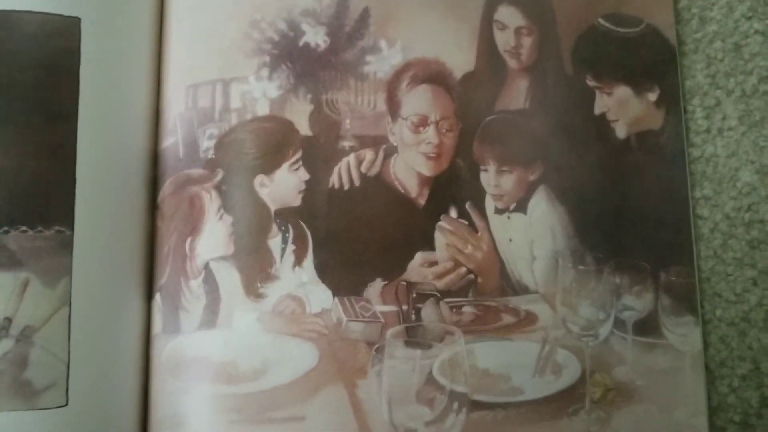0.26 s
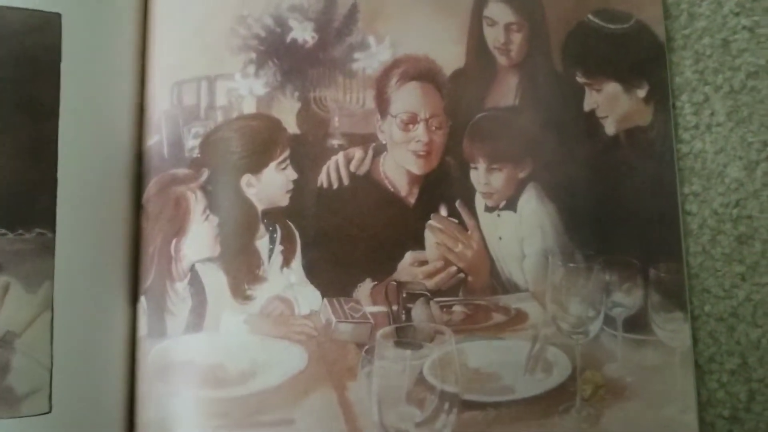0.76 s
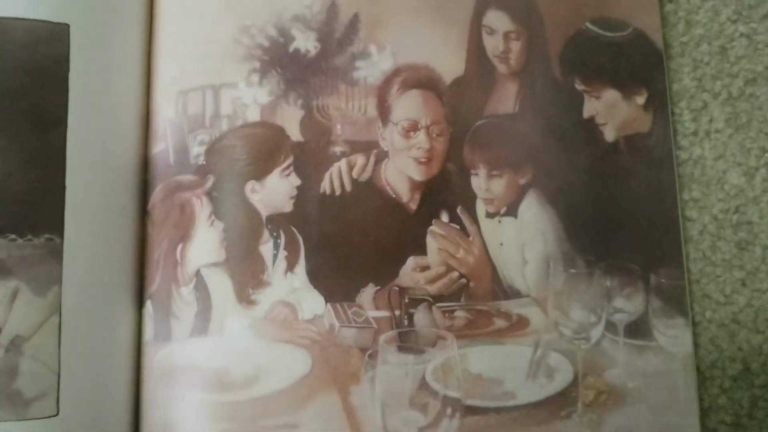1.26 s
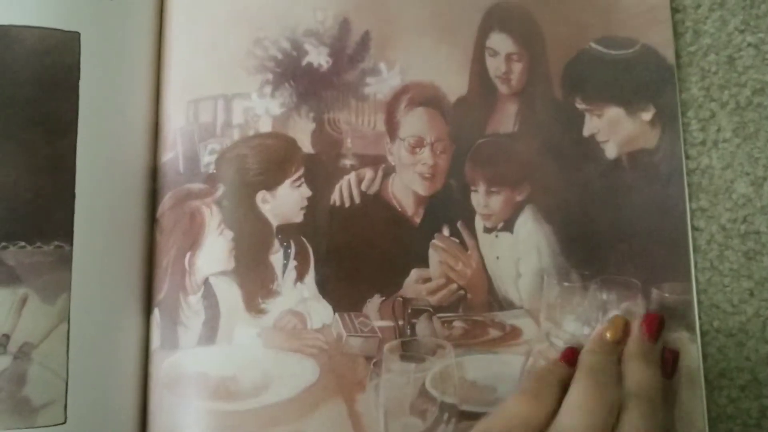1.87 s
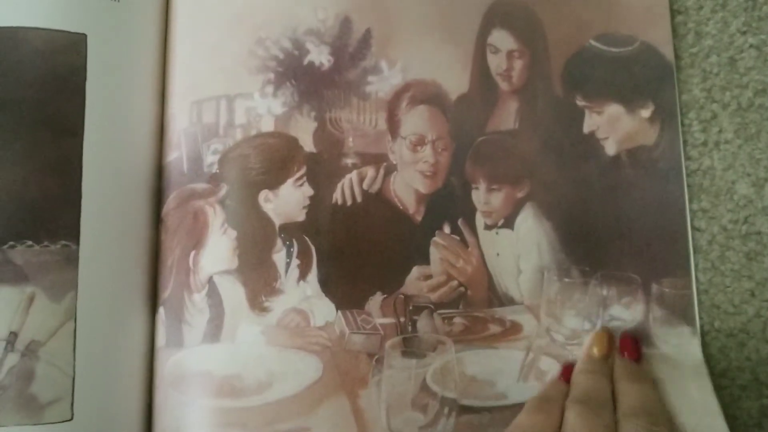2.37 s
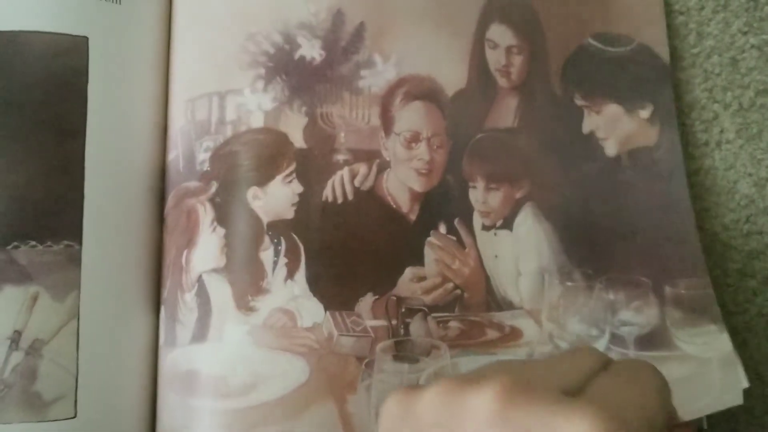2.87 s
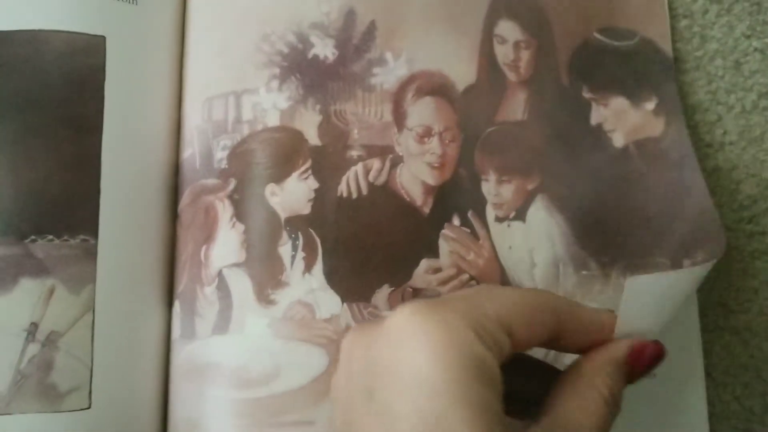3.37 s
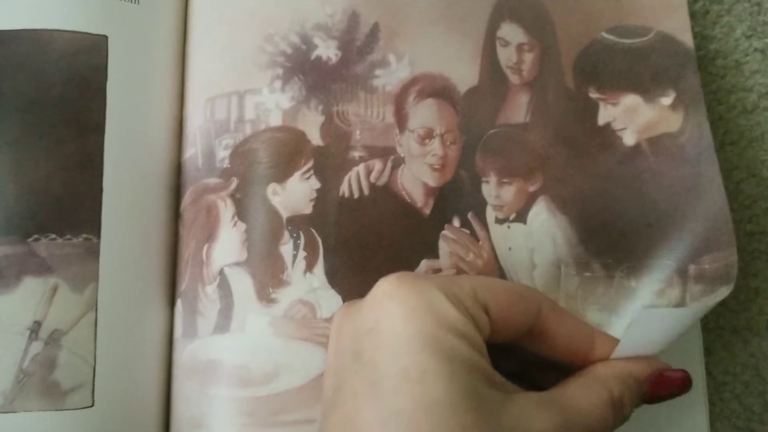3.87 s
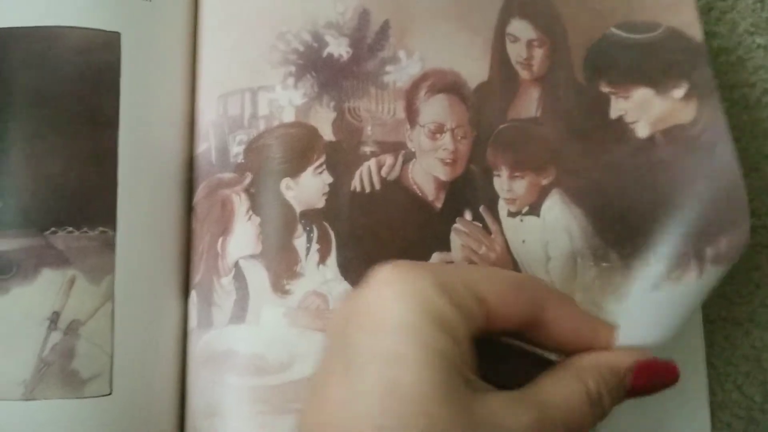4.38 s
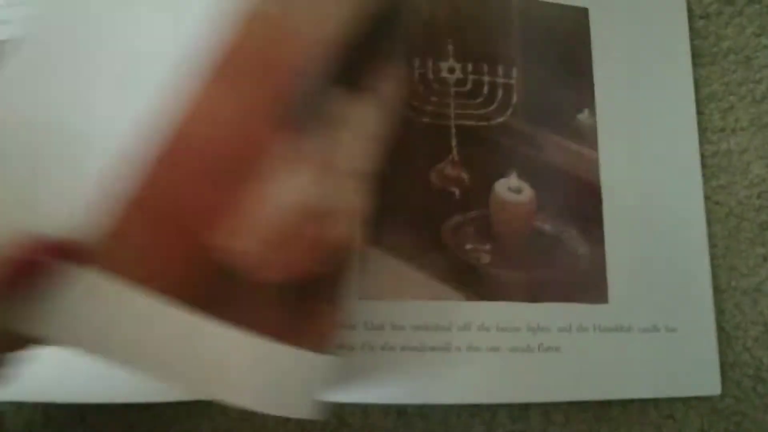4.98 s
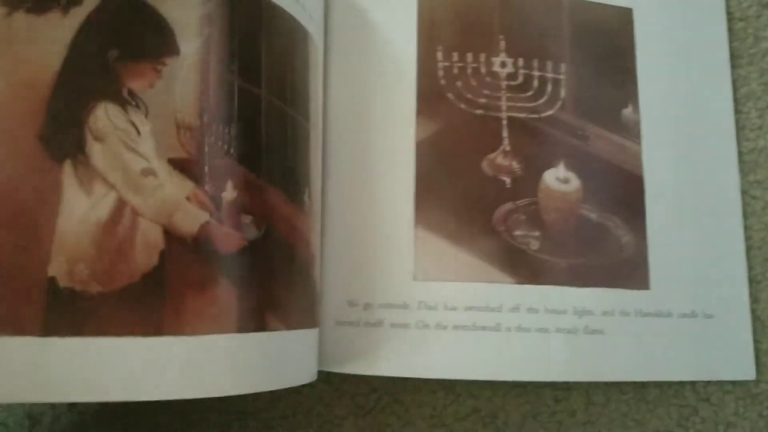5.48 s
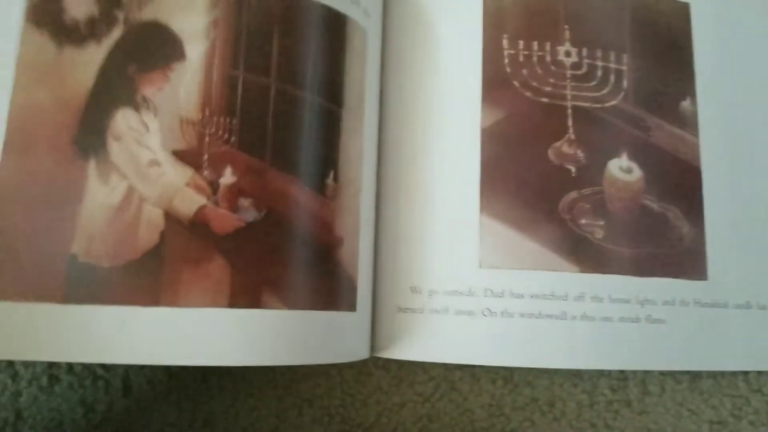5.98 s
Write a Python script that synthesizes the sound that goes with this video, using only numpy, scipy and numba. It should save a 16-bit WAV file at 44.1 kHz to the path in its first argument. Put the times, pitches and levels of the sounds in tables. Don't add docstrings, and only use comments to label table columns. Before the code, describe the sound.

A tiny click on the left opens a nearly silent carpeted room with soft hiss and low rumble. A hand brushes faintly over a book, then fingers rub the glossy page in short uneven strokes with tiny scratchy ticks. The lifted corner gives loud dry pops, pauses, and pops again; the stiff sheet swings over with papery snaps and low air thumps, ending in light skin rustles. Close stereo microphone, page stronger on the right.

```python
import sys
import numpy as np
from scipy import signal
from scipy.fft import rfft, irfft, next_fast_len
from scipy.io import wavfile
from numba import njit

SR = 44100
rng = np.random.default_rng(int(sys.argv[2]) if len(sys.argv) > 2 else 0)


def store_pcm(level_fs):
    pcm = np.round(np.clip(level_fs, -1, 1) * 32767).astype(np.int16)
    wavfile.write(sys.argv[1], SR, np.atleast_2d(pcm).T)


def magnitude_from_level(level_db):
    exponent = np.asarray(level_db, float) / 20
    return 10 ** exponent


N = 275360


# f/Hz, level/dB per Hz
FRICTION_SPECTRUM = [(150, -40), (250, -13.5), (319, -4), (354, -9), (618, -1), (686, 3), (1640, 0),
                     (2570, -5), (5730, -4), (8260, -7.5), (9830, -9), (14400, -5.5), (16000, -9)]
# t/s, ring of the air gap f/Hz, hiss over friction level/dB, ring level/dB
FINGERTIPS = [(.5, 3350, -0.5, -13), (1.3, 4370, -3.5, -6.5), (1.5, 3500, 0.5, -17), (1.58, 4500, -3, 7),
              (1.78, 4500, -1, 6.5), (1.9, 2960, 4, -21), (2.3, 2840, -6, -2.5), (2.45, 2650, -9.5, -0.5),
              (2.62, 2600, -9, -16), (2.82, 3600, -2, -5), (3.05, 2600, -4.5, -10.5), (3.3, 2280, -5.5, -1),
              (3.8, 2150, -1.5, -6), (3.93, 3140, -2.5, 0), (4.2, 2130, -9, -28), (4.4, 3540, -3.5, -6),
              (4.65, 4450, -0.5, -12), (4.8, 3280, -9, -11), (5.2, 3580, -7, -4), (5.36, 3760, -9.5, -7),
              (5.46, 3800, -7, -3.5), (5.55, 2600, 6.5, -17), (5.98, 2600, -3, -7), (6.07, 2970, -5.5, 7),
              (6.11, 3600, -3.5, 0.5), (6.2, 3830, -1.5, 3)]
PATCH_EDGES = (3500, 5500, 7200, 9300, 12000, 16000)


def strokes():
    (rub, load, carried), (ring_hz, dry_db, ring_db) = hand(), in_time(FINGERTIPS)
    body_top_hz, friction_top_hz = 1890, 4420
    catch = magnitude_from_level(1 * drift(42))
    grain = magnitude_from_level(3 * drift(130))

    speck_here = rng.random(N) < 600 * magnitude_from_level(3 * drift(25)) / SR
    speck_db = 6 + 2.5 * np.minimum(rng.exponential(size=N), 3)
    grit = speck_here * magnitude_from_level(speck_db)

    def below(hz, edge_hz):
        return 1 / (1 + (hz / edge_hz) ** 10)

    def three_shares(hz):
        low, middle = below(hz, body_top_hz), below(hz, friction_top_hz)
        shares = np.array([low, middle - low, 1 - middle])[:, None]
        return magnitude_from_level(at_hz(FRICTION_SPECTRUM, hz)) * shares

    rubbing = (catch + grit) * rng.standard_normal((2, N))
    body, friction, hiss = coloured(rubbing, three_shares)

    gap_r = np.exp(-np.pi * 380 / SR)
    ring = moving_resonance(np.ascontiguousarray(friction), ring_hz, gap_r, SR)
    friction = rms_one(friction + magnitude_from_level(ring_db) * ring)

    patches = 0
    for k, (low_hz, high_hz) in enumerate(zip(PATCH_EDGES, PATCH_EDGES[1:])):
        patches = patches + magnitude_from_level(2.5 * drift(22.0)) * band(hiss, low_hz, high_hz) * (-1) ** k

    flexing = rms_one(0.5 * body + resonance(body, 874, 400))
    sheet = magnitude_from_level(3.2 * drift(21.1)) * (load * rms_one(grain * body) + carried * flexing)
    skin = rms_one(np.sqrt(grain)) * friction + magnitude_from_level(dry_db) * rms_one(patches)
    return sheet + rub * skin


# start t/s, fastest t/s, stop t/s, level/dB, weight on the sheet level/dB
FINGER_STROKES = [(1.785, 1.822, 1.88, -59, -0.5), (1.878, 2.04, 2.104, -52, -12),
                  (2.142, 2.262, 2.317, -46, -11.5), (2.324, 2.36, 2.41, -43.5, -6),
                  (2.385, 2.434, 2.45, -40, -9), (2.45, 2.458, 2.65, -69, -12),
                  (2.461, 2.66, 2.69, -48.5, 0), (2.68, 2.685, 2.73, -53.5, -23),
                  (2.81, 2.832, 2.92, -43.5, -10.5), (2.904, 2.9, 2.99, -49.5, -17),
                  (2.984, 3.044, 3.11, -47.5, -2.5), (3.719, 3.741, 3.88, -43.5, -14.5),
                  (3.918, 3.931, 4.02, -45, -2), (4.037, 4.14, 4.27, -47, -5),
                  (4.33, 4.394, 4.47, -46.5, -2), (4.43, 4.442, 4.55, -53.5, -6),
                  (4.527, 4.568, 4.71, -44.5, -11.5), (4.618, 4.66, 4.71, -53, -7.5),
                  (4.68, 4.725, 4.738, -47.5, -7.5), (5.156, 5.17, 5.25, -38.5, -4),
                  (5.301, 5.35, 5.42, -51, -10.5), (5.35, 5.365, 5.41, -40.5, -1.5),
                  (5.38, 5.42, 5.464, -42, -4), (5.9, 5.905, 6.16, -58.5, -11.5),
                  (5.975, 5.99, 5.98, -54, -21), (6.066, 6.098, 6.08, -42.5, -18),
                  (6.106, 6.118, 6.136, -54.5, 6), (6.145, 6.205, 6.3, -59, -27)]
HAND_APPROACH = [
    (0.528, 0.625, 0.96, -72, -31),
    (1.05, 1.053, 1.18, -72.5, 1.5),
    (1.093, 1.19, 1.42, -63.5, -21),
    (1.467, 1.517, 1.555, -57, -4),
    (1.594, 1.684, 1.83, -64.5, -11),
]
# t/s, creep level/dB, load on the sheet level/dB
HAND_CARRY = [(.5, -92, -13), (.57, -85.5, -39), (1.6, -69.5, -17), (2.1, -65, -4.5), (2.78, -66.5, -11.5),
              (3.11, -59.5, -6), (3.3, -65.5, 3.5), (3.45, -64.5, -4), (3.6, -62, 6.5), (4.25, -57.5, -10),
              (4.76, -70.5, -10.5), (4.85, -63, -2.5), (5.03, -71, 16), (5.15, -70, 19), (5.26, -58.5, -7),
              (5.56, -67.5, 5), (5.77, -63.5, 7.5), (5.88, -59, -18)]


def hand():
    speed_up_db, slow_down_db = 8.5, 12
    finger_touch_s, brush_touch_s = 0.0054, 0.025
    creep_db, load_db = in_time(HAND_CARRY)
    rub, load, t = magnitude_from_level(creep_db), 0, np.arange(N) / SR
    moves = [(*row, brush_touch_s) for row in HAND_APPROACH]
    moves += [(*row, finger_touch_s) for row in FINGER_STROKES]
    for start, fastest, stop, db, weight_db, touch_s in moves:
        before = np.clip((fastest - t) / max(fastest - start, finger_touch_s), 0, 1)
        after = np.clip((t - fastest) / max(stop - fastest, finger_touch_s), 0, 1)
        touch = np.clip(np.minimum(t - start, stop - t) / touch_s + .5, 0, 1)
        stroke = touch * magnitude_from_level(db - speed_up_db * before - slow_down_db * after ** 2)
        rub = np.hypot(rub, stroke)
        load = np.hypot(load, stroke * magnitude_from_level(weight_db))
    return rub, load, magnitude_from_level(creep_db + load_db)


# t/s, peak level/dB, ring f/Hz
EDGE_SLIPS = [(1.899, -43, 4220), (2.421, -19, 2590), (2.435, -36, 2640), (2.467, -16, 1020),
              (2.487, -29, 2690), (2.503, -35, 2600), (3.419, -27.5, 1470), (3.651, -34, 1320),
              (3.663, -51, 915), (3.672, -46, 905), (4.954, -49, 796.7), (4.965, -49, 800),
              (4.975, -46, 821), (5.006, -39.5, 848), (5.023, -36.5, 800), (5.154, -23, 1084),
              (5.501, -42, 2520), (2.3244, -25, 2593), (3.7164, -37.5, 2100)]
# t/s, peak level/dB, ring f/Hz
EDGE_RATCHET = [(2.549, -31, 990), (2.569, -33, 1500), (2.574, -23, 1510), (2.586, -29.5, 961),
                (2.591, -26.5, 993), (2.597, -31, 900), (2.605, -27, 950), (2.611, -31, 1000),
                (2.618, -35, 900), (2.637, -33, 791), (2.644, -45, 937), (2.651, -35, 705),
                (2.657, -38, 1000)]
# t/s, peak level/dB, ring f/Hz
GRIT_CATCHES = [(2.194, -30, 2040), (2.229, -44, 2710), (2.261, -38, 2770), (2.288, -30, 1470),
                (2.344, -35, 1500), (2.365, -24, 1290), (2.375, -30, 2080), (2.383, -33, 1000),
                (2.393, -25, 1200), (2.404, -31, 1500), (2.411, -24, 1200), (2.429, -27, 1480),
                (2.453, -59, 1100), (3.125, -45, 2300), (3.317, -41, 3800), (3.374, -54, 2500),
                (3.949, -41, 1500), (4.132, -37, 900), (4.453, -32, 598), (3.102, -34, 2080),
                (4.142, -33, 2000), (4.148, -31, 1300), (4.284, -32, 974), (5.334, -29.5, 740),
                (5.359, -29, 900), (5.364, -32, 972), (5.498, -35, 775)]


def page_edge():
    edge = slips(EDGE_SLIPS, edge_hz=2300, edge_share=0.19, trim_db=-6.5, scratch_s=.0015, top_hz=6400)
    edge = edge + slips(EDGE_RATCHET, edge_hz=3200, edge_share=0.46, trim_db=-3.0, scratch_s=.0006, top_hz=8700)
    return edge + slips(GRIT_CATCHES, edge_hz=1400, edge_share=0.3, trim_db=-4.5, scratch_s=0.001, top_hz=6420)


def slips(rows, edge_hz, edge_share, trim_db, scratch_s, top_hz):
    t = np.arange(400) / SR
    scratches = np.exp(-t / scratch_s) * rng.laplace(size=(len(rows), 2, len(t)))
    rings = []
    for scratch, (_, _, hz) in zip(scratches, rows):
        ring = resonance(scratch, hz, 390) + edge_share * resonance(scratch, edge_hz, 1140)
        rings.append(ring + 0.025 * band(scratch, 630, top_hz))
    s, peak_db, _ = np.transpose(rows)[:, :, None, None]
    return placed(s.ravel(), magnitude_from_level(peak_db + trim_db) * peak_one(band(np.array(rings), 560, top_hz)))


# t/s, crack level/dB, ring f/Hz, bright level/dB, length/ms
PRESSED_CREASES = [(1.8183, -30.5, 3000, 6.5, 0.85), (1.8586, -24.5, 3020, 0, 0.56),
                   (2.1531, -35, 2620, -33, 7.7), (2.1614, -29.5, 2860, -3, 3.1),
                   (2.3334, -24, 2280, -18, 4.9), (2.4621, -25, 1310, -14.5, 3.5),
                   (2.5309, -20, 2190, -19, 3.5), (2.557, -29, 1470, -22, 0.61),
                   (2.6262, -18, 2280, -15, 2.6), (2.6652, -19.5, 2600, -8, 0.56),
                   (2.666, -25.5, 455, -1.5, 1.05), (2.8245, -38.5, 2090, -4, 6.2),
                   (2.8987, -28, 1510, -39, 9.8)]
LIFTED_CREASES = [(3.0085, -28, 1300, -16, 11), (3.1118, -38, 2100, -18, 0.5),
                  (3.1301, -19, 1170, -14, 1.9), (3.1355, -22, 900, -20, 4.6), (3.1774, -16, 910, -13, 2.2),
                  (3.182, -25, 1500, -8.5, 1.145), (3.2638, -16, 1060, -18, 0.98),
                  (3.2675, -18.5, 960, -10, 1.4), (3.3805, -11.5, 901, -14.5, 2.07),
                  (3.4888, -12.5, 1010, -14, 1.5), (3.4912, -16, 1170, -12.5, 0.51),
                  (3.5257, -22, 1430, -22, 0.71), (3.5272, -17, 865, -8.5, 1.1),
                  (3.567, -12.5, 1010, -14.5, 0.66), (3.5685, -19.5, 2100, -6, 0.7),
                  (3.6033, -13.5, 1570, -11.5, 1.2), (3.6363, -25, 1360, -14.5, 4.2),
                  (3.92, -29.5, 1560, -9, 1.8), (3.9422, -27, 1370, -21.5, 0.19),
                  (3.9937, -26, 970, -10.5, 1.2), (4.021, -43, 2090, -16.5, 0.74),
                  (4.0562, -15, 1100, -14, 1.2), (4.0592, -19, 2190, -17, 2.3),
                  (4.1075, -19.5, 970, -17, 0.63), (4.1088, -5.5, 950, -14.5, 0.6),
                  (4.1125, -23, 1000, -13, 1.0), (4.157, -15.5, 1430, -9.5, 0.21),
                  (4.1634, -13, 785, -24, 1.2), (4.339, -27.5, 2600, -14.5, 3.5),
                  (4.3715, -22, 1910, -27, 2.7), (4.5675, -20, 997, -25, 3.2),
                  (4.5725, -28.5, 1100, -12, 3.54), (5.8985, -23, 2600, -21, 0.52),
                  (5.9722, -20, 2800, -26, 0.39), (6.0945, -27.5, 3260, -9, 7.4),
                  (6.111, -23.5, 3558, -12, 2.1), (6.117, -35, 710, -27, 7.1)]


def corner():
    return creases(PRESSED_CREASES, rise_share=.6) + creases(LIFTED_CREASES, rise_share=.15)


def creases(rows, rise_share):
    s, crack_db, ring_hz, tone_db, ms = np.transpose(rows)[:, :, None, None]
    ring_db = crack_db - 7 - 2.5 * np.log2(ms)
    bright_db = crack_db + tone_db
    cracks, shove = crack_burst(ms, rise_share)

    after_ms = np.maximum(np.arange(cracks.shape[-1]) / SR - .005, 0) * 1000
    tearing = np.exp(-(after_ms / (1.6 * ms + 1)) ** 2)
    drive = shove + 0.27 * cracks * tearing
    pitches = ring_hz.ravel()
    ring = np.array([resonance(resonance(d, hz, 0.9 * hz), hz, 0.62 * hz) for d, hz in zip(drive, pitches)])
    crack = np.array([band(c, 0.56 * hz, 3510) for c, hz in zip(cracks, pitches)])

    out = magnitude_from_level(crack_db - 3.0) * peak_one(crack)
    out = out - magnitude_from_level(bright_db + 2.0) * peak_one(band(cracks, 6200, 19700))
    out = out - magnitude_from_level(crack_db - 18) * peak_one(band(cracks, 2200, 7440))
    air = 0.036 * peak_one(band(shove, 44.5, 170)) + 0.13 * peak_one(band(drive, 410, 750))
    out = out + magnitude_from_level(ring_db + 1.5) * (peak_one(ring) + 1000 / ring_hz * air)
    return placed(s.ravel() - .0045, out)


def crack_burst(ms, rise_share):
    t = np.arange(2200) / SR - .005
    length, after = np.clip(ms, .2, 8) / 1000, np.maximum(t, 0)
    burst = np.exp(np.minimum(t, 0) / (rise_share * length) - (after / (1.16 * length)) ** 1.02)
    burst = burst + 0.085 * (t > 0) * np.exp(-after / 0.0097)
    shove = -after / 0.00015 * np.exp(-after / 0.00011) * np.ones((len(ms), 2, 1))
    return burst * rng.laplace(size=(len(ms), 2, len(t))), shove


# t/s, crack peak level/dB, sheet body level/dB, bright level/dB,
# length/ms
SHEET_SNAPS = [(1.0544, -56, -63, -73, 0.79), (1.078, -52, -59, -36, 2.1), (1.094, -58, -60, -62, 1.4),
               (1.121, -65, -70, -70, 1.3), (4.567, -30, -30, -28, 7.5), (4.5705, -28, -43, -21.5, 9.3),
               (4.997, -49, -51.5, -66, 1.11), (5.039, -21, -16.5, -43, 0.86),
               (5.083, -13.5, -12.5, -32, 0.53), (5.1283, -14, -15.5, -40, 0.95),
               (5.1574, -21, -23, -45.5, 1.7), (5.5212, -35.5, -37, -43.5, 2.5),
               (5.552, -11, -22, -7, 0.96), (5.6165, -22, -21.5, -16, 2.35),
               (5.6943, -18.5, -23.5, -29, 2.25), (5.7353, -22, -29.5, -27, 1.9)]
# f/Hz, width f/Hz, level/dB
SHEET_MODES = [(756, 200, 5.5), (1100, 68, -10.5), (416, 370, -11.5), (293, 106, -1.5), (583, 180, -4.5)]


def snaps():
    s, crack_db, body_db, bright_db, ms = np.transpose(SHEET_SNAPS)[:, :, None, None]
    thump_db = -17 + 0.64 * body_db
    cracks, shove = crack_burst(ms, rise_share=0.04)
    body = sum(magnitude_from_level(db) * resonance(shove + 0.15 * cracks, hz, width) for hz, width, db in SHEET_MODES)

    out = magnitude_from_level(crack_db + 0.5) * peak_one(band(cracks, 1590, 3550))
    out = out - magnitude_from_level(bright_db - 13.5) * peak_one(band(cracks, 4800, 24000))
    out = out + magnitude_from_level(body_db + 7.5) * peak_one(body)
    out = out + magnitude_from_level(thump_db + 8.5) * peak_one(band(shove, 38.5, 230))

    t = np.arange(out.shape[-1]) / SR - .007
    flutter = rms_one(band(rng.standard_normal(out.shape[::2])[:, None], 175, 900))
    shudder = (t > 0) * np.exp(-t / 0.025) * flutter
    out = out + magnitude_from_level(body_db - 19) * shudder
    out = out + magnitude_from_level(crack_db - 43) * peak_one(band(cracks, 2600, 5440))
    return placed(s.ravel() - .0045, out)


def hand_echo(paths):
    at = np.arange(N)
    lag = SR / in_time(FINGERTIPS)[0] * magnitude_from_level(1.74 * drift(2.2))
    return paths + 0.29 * np.array([np.interp(at - lag, at, path) for path in paths])


# t/s, pull level/dB, rattle level/dB, swing level/dB, edge f/Hz
BUTTON_TICKS = [
    (0.0931, -33, -5, -25, 1100),
    (0.1244, -25.5, -3.5, -32, 2220),
]


def button():
    s, pull_db, tick_db, swing_db, edge_hz = np.transpose(BUTTON_TICKS)[:, :, None]
    swing_hz, swing_s, swing_rise_s = 43, 0.0063, 0.0023
    t = np.arange(2000) / SR - .005
    before, after = np.minimum(t, 0), np.maximum(t, 0)
    pull = -(np.exp(before / .0004) + 0.2 * np.exp(before / 0.0015)) * (t < 0)
    swing = (1 - np.exp(-after / swing_rise_s)) * np.exp(-after / swing_s)
    swing = swing * np.cos(2 * np.pi * swing_hz * after)
    rattle = np.exp(before / 0.00071 - after / 0.00017) * rng.standard_normal((len(BUTTON_TICKS), len(t)))
    moves = magnitude_from_level(pull_db + 6) * pull + magnitude_from_level(swing_db + 1) * swing
    push = np.array([band(move, 6.8, hz) for move, hz in zip(moves, edge_hz.ravel())])
    tick = push + magnitude_from_level(tick_db - 20.5) * resonance(rattle, 2400, 1900)
    return placed(s.ravel() - .005, tick[:, None] * [[1], [.05]])


# f/Hz, width f/Hz, level/dB
CASE_MODES = [(2600, 2600, 0), (4190, 540, 2.5), (7960, 955, 11.5), (11910, 620, 7)]
# f/Hz, share
COMMON_SHARE = [(60, .95), (700, .97), (2000, .8), (6000, .65), (14000, .45)]
# f/Hz, level/dB
LEFT_SHADE = [(60, -4.5), (110, -6), (200, -4.5), (380, -1.5), (700, -1), (1290, -3.5), (2380, -10.5),
              (4400, -6.5), (8120, -9.5), (15000, -2.5)]
# f/Hz, phase/rad
LEFT_PHASE = [(0, 0), (1210, -0.7), (1550, -0.2), (2330, 5.0), (3790, 2.9), (4570, 4.8), (5860, 4.8),
              (7240, 9.0), (8790, 10.8), (10900, 6.0), (12500, 0.2), (12900, -0.3), (15200, 8.9),
              (16200, 5.6)]


def ports(paths):
    paths = paths + sum((magnitude_from_level(db) - 1) * resonance(paths, hz, width) for hz, width, db in CASE_MODES)

    def same(hz):
        return np.clip(at_hz(COMMON_SHARE, hz), 0, 1)

    def shade(hz):
        return magnitude_from_level(at_hz(LEFT_SHADE, hz) / 2)

    def lead(hz):
        return np.exp(1j * np.interp(hz, *np.transpose(LEFT_PHASE)))

    left = coloured(paths[0], lambda hz: same(hz) * lead(hz) * shade(hz))
    left = left + coloured(paths[1], lambda hz: np.sqrt(1 - same(hz) ** 2) * shade(hz))
    return np.array([left, coloured(paths[0], lambda hz: 1 / shade(hz))])


# t/s, extra left minus right treble level/dB
PAGE_BEARING = [(0.5, 2), (1.0, 2.5), (1.75, 3.5), (1.86, -0.5), (1.95, 4), (2.2, 1), (3.0, 1.5),
                (3.6, -0.5), (4.1, -0.5), (4.25, 7.5), (4.36, -1), (4.66, 2.5), (4.9, -2.5), (5.2, 1.5),
                (5.4, -3), (5.64, 0.5), (5.95, 3), (6.2, 3)]


def turned(pair):
    treble = coloured(pair, lambda hz: 1 - 1 / (1 + (hz / 1300) ** 4))
    return pair + (magnitude_from_level(in_time(PAGE_BEARING)[0] * [[.5], [-.5]]) - 1) * treble


def room(x):
    t60_s, tail_db, wall_echo_s, wall_echo_db = 0.19, -12, 0.0046, -30
    t = np.arange(SR // 3) / SR
    tail = rng.standard_normal((2, len(t))) * magnitude_from_level(-60 * t / t60_s) * (t > .004)
    tail = magnitude_from_level(tail_db) * tail / np.sqrt(np.sum(tail[0] ** 2))
    tail[:, round(wall_echo_s * SR)] += magnitude_from_level(wall_echo_db)
    dull = magnitude_from_level(-3) * band(tail, 270, 1180) - band(tail, 1170, 2580)
    book_gap = 0.8 * resonance(tail, 2150, 350)
    return signal.fftconvolve(x[None], dull + book_gap, axes=1)[:, :N]


# f/Hz, level/dB per Hz
PORT_HISS = [(180, -20), (300, -4), (488, -8), (531, -8.5), (5100, -13), (9180, -23), (12800, -2),
             (15700, -4.5), (16500, -34)]
# f/Hz, level/dB per Hz
ROOM_RUMBLE = [(15, -40), (25, -38), (48, 8), (92, -5), (124, -4), (146, -10), (180, -1), (199, -25.5),
               (400, -51), (520, -82), (880, -120)]
# t/s, level/dB
RUMBLE_SWELLS = [(0.0, -61.5), (0.68, -72.5), (1.36, -59.5), (2.62, -59), (2.95, -67), (3.44, -56),
                 (3.79, -63.5), (4.14, -54), (4.99, -56), (5.16, -49.5), (5.65, -43.5), (5.91, -59),
                 (6.24, -61)]
# f/Hz, rms level/dB
MAINS_HUM = [(120, -70.5)]


def floor():
    hiss_noise = coloured(rng.standard_normal((2, N)), lambda hz: magnitude_from_level(at_hz(PORT_HISS, hz)))
    hiss = magnitude_from_level(-74 + 4.0) * rms_one(hiss_noise)
    mid, side = rms_one(coloured(rng.standard_normal((2, N)), lambda hz: magnitude_from_level(at_hz(ROOM_RUMBLE, hz))))
    still = magnitude_from_level(-63.5) * (mid + 0.62 * side * [[1], [-1]])
    swell_db = in_time(RUMBLE_SWELLS)[0] - 5.5 + 1.7 * drift(2.9)
    swell = magnitude_from_level(swell_db) * rms_one(band(rng.standard_normal(N), 45, 157.0))
    hum = sum(magnitude_from_level(db + 5.5) * np.sin(2 * np.pi * hz * np.arange(N) / SR) for hz, db in MAINS_HUM)
    return hiss + still + swell + hum


def rms_one(x):
    return x / np.sqrt(np.mean(x ** 2) + 1e-20)


def peak_one(rows):
    return rows / np.abs(rows).max(axis=-1, keepdims=True)


def in_time(rows):
    s, *columns = np.transpose(rows)
    return [np.interp(np.arange(N) / SR, s, c) for c in columns]


def at_hz(points, hz):
    point_hz, value = np.transpose(points)
    return np.interp(np.log(hz + 1), np.log(point_hz + 1), value)


def coloured(x, gain_at):
    size = next_fast_len(x.shape[-1])
    hz = np.arange(size // 2 + 1) * SR / size
    return irfft(rfft(x, size) * gain_at(hz), size)[..., :x.shape[-1]]


def band(x, low_hz, high_hz):
    sos = signal.butter(2, [low_hz, min(high_hz, .45 * SR)], "band", fs=SR, output="sos")
    return signal.sosfilt(sos, x)


def resonance(x, hz, width_hz):
    r = np.exp(-np.pi * width_hz / SR)
    poles = [1, -2 * r * np.cos(2 * np.pi * hz / SR), r * r]
    return signal.lfilter(np.array([1, 0, -1]) * (1 - r * r) / 2, poles, x)


@njit
def moving_resonance(x, hz, r, rate):
    y = np.zeros_like(x)
    for i in range(2, x.shape[1]):
        turn = 2 * r * np.cos(2 * np.pi * hz[i] / rate)
        for c in range(x.shape[0]):
            y[c, i] = x[c, i] - x[c, i - 2] + turn * y[c, i - 1] - r * r * y[c, i - 2]
    return y * (1 - r * r) / 2


def drift(rate):
    r = np.exp(-2 * np.pi * rate / SR)
    return rms_one(signal.lfilter([1], [1, -2 * r, r * r], rng.standard_normal(N + SR))[SR:])


def placed(times, bursts):
    length = bursts.shape[-1]
    out = np.zeros(bursts.shape[1:-1] + (N + length,))
    for s, burst in zip(times, bursts):
        start = round(s * SR)
        out[..., start:start + length] += burst
    return out[..., :N]


def scene():
    page = hand_echo(strokes() + page_edge()) + corner() + snaps()
    return turned(ports(page)) + room(page[0]) + button() + floor()


def band_limit(x):
    return signal.sosfilt(signal.butter(12, 16650, fs=SR, output="sos"), x)


def record(dry):
    overload = 0.65
    rounded = overload * np.tanh(dry / overload)
    top_cut = signal.sosfilt(signal.cheby2(12, 25, 15750, fs=SR, output="sos"), rounded)
    mix = band(band(top_cut, 37, 20000), 37, 20000)
    return band_limit(mix)


dry = scene()
out = record(dry)
store_pcm(out)
```